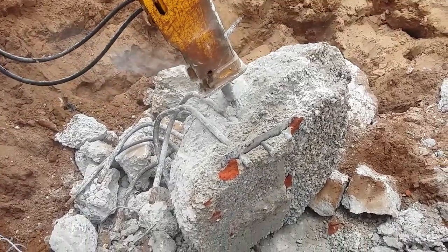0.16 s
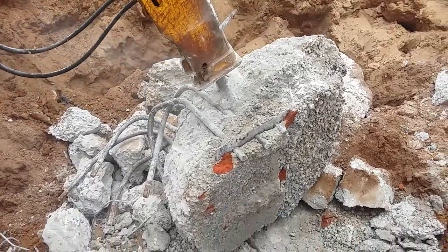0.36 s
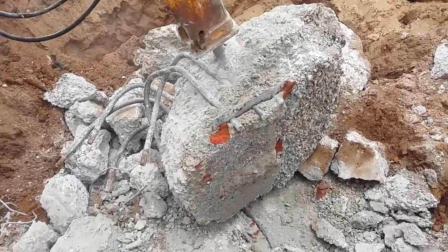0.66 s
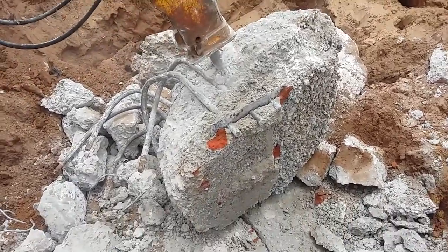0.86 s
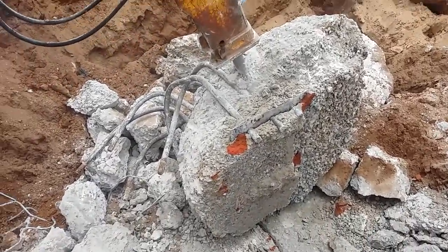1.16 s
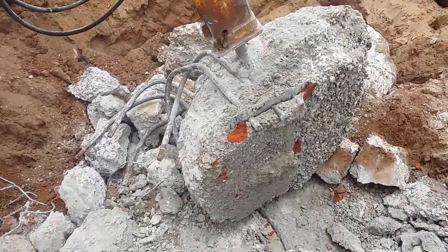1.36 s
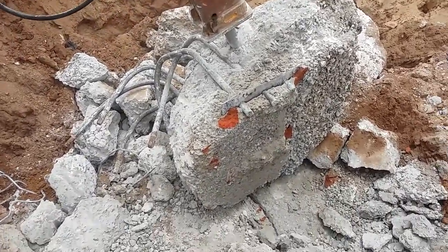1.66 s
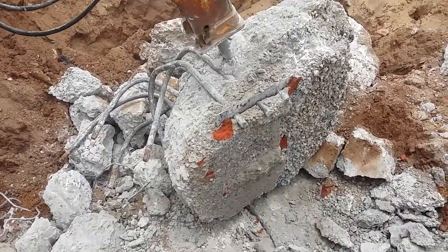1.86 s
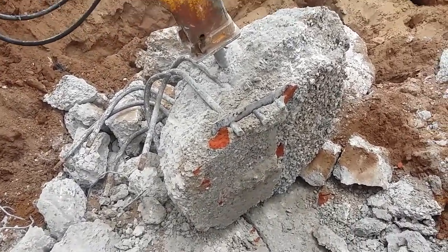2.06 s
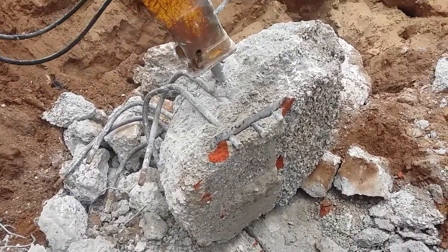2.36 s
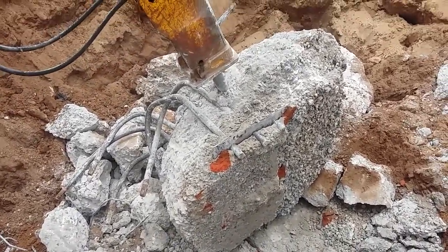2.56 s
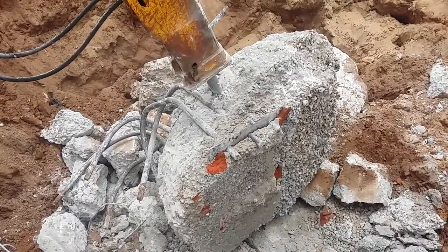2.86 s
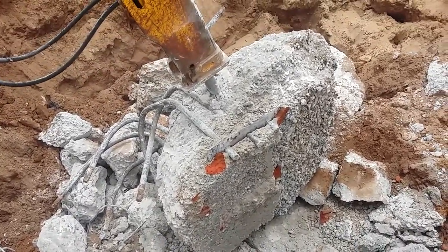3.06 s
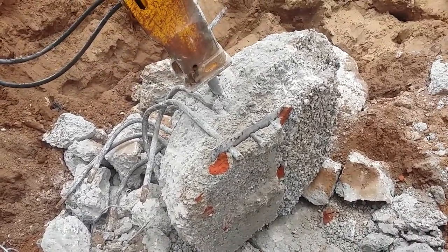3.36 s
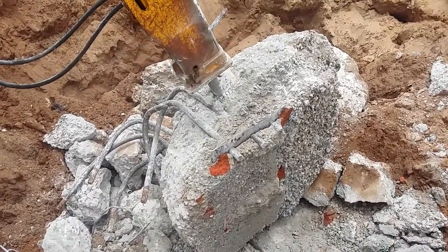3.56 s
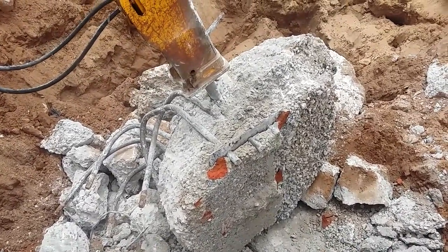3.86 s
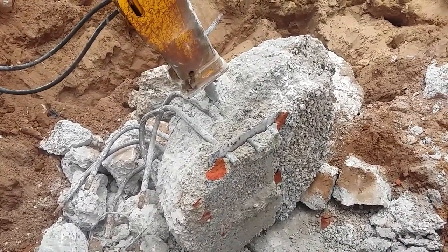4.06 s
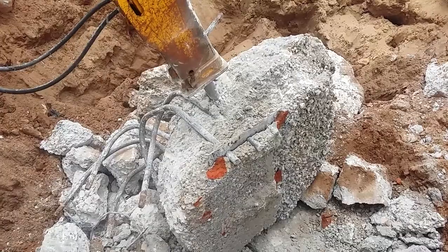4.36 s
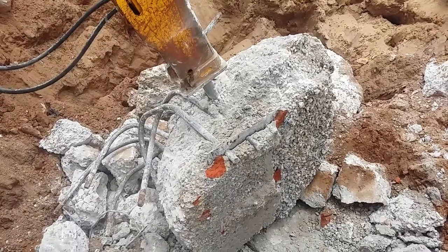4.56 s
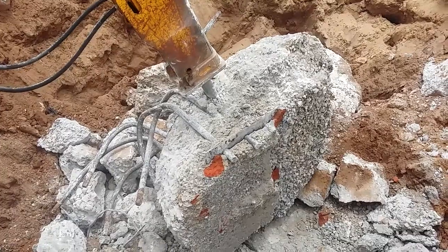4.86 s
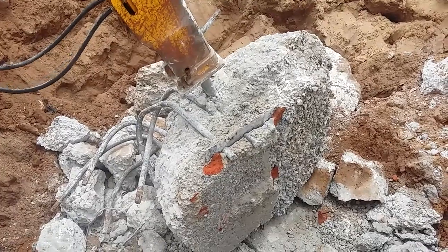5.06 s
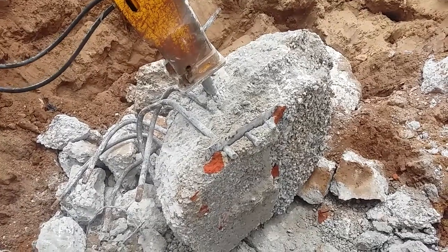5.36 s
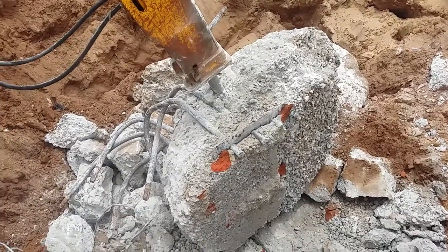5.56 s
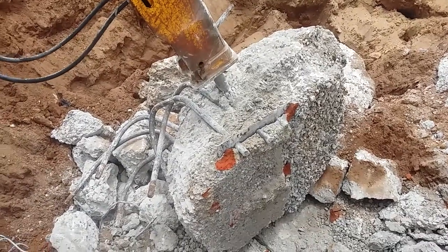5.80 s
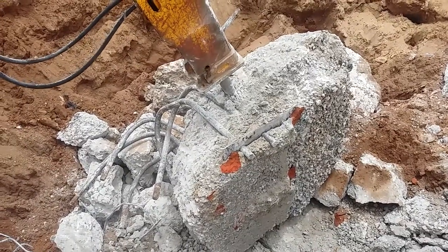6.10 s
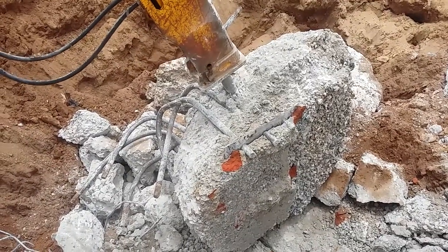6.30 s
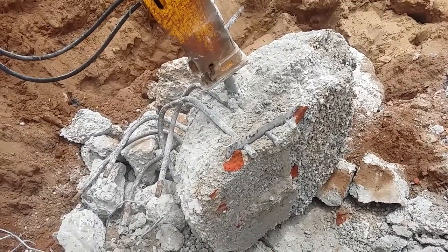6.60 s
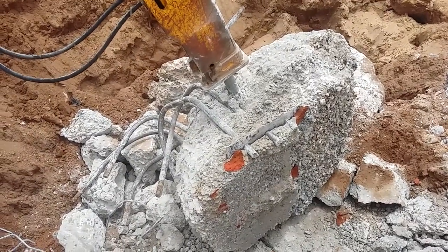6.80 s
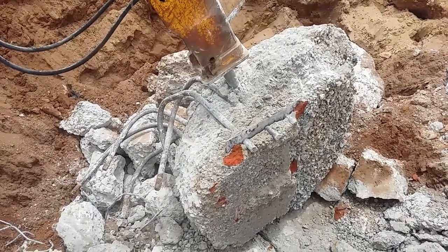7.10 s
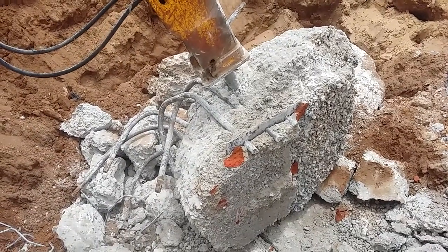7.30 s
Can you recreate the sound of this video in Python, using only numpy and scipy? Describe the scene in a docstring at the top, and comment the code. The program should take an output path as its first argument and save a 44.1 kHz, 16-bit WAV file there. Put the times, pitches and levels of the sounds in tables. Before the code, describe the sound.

A hydraulic breaker pounds concrete in rapid, even, ringing blows over a running diesel engine, hesitating briefly twice.

```python
"""Over a running diesel, an excavator's hydraulic breaker pounds concrete, nearly 11 blows a second.
Each blow: a valve clacks, the piston hits, the chisel cracks, concrete fizzes and sheds chips, machine
and pit clatter, the housing rings, the block thuds, the arm drones. The hammer stalls briefly at 1.2 s,
resumes and brightens as the chisel sinks, stumbles at 5 s, stalls again and pounds on from 5.2 s.
A phone listens from a few metres."""
import sys
import numpy as np
from scipy import signal
from scipy.fft import rfft, irfft
from scipy.io import wavfile
from scipy.ndimage import uniform_filter1d

SR = 44100
rng = np.random.default_rng(int(sys.argv[2]) if len(sys.argv) > 2 else 0)


def master(y):
    """Save y as 16-bit WAV."""
    cut = np.clip(np.atleast_2d(y).T, -1, 1)
    pcm = np.round(cut * 32767)  # scale
    wavfile.write(sys.argv[1], SR, pcm.astype(np.int16))


N = 328104
BLOW_SAMPLES = 8192
AGE_S = np.arange(BLOW_SAMPLES) / SR
BINS_HZ = np.arange(BLOW_SAMPLES // 2 + 1) * SR / BLOW_SAMPLES
PORT_LAG_S = .00011  # right microphone port behind left

# chisel sunk into the block: time_s, depth (0-1)
SINKING = [(0, 0.18), (1.15, 0.25), (1.35, 0.39), (2.3, 0.64), (3.3, 0.76), (4.3, 0.8), (5.0, 0.86),
           (5.3, 0.98), (7.4, 0.87)]


def undb(db):
    """Decibels to gain."""
    return np.exp(np.asarray(db) * (np.log(10) / 20))


def contour(points, size=BLOW_SAMPLES):
    """(freq_hz, value) points joined on a log axis, one value per bin."""
    hz, values = np.transpose(points)
    bins_hz = np.maximum(np.arange(size // 2 + 1) * SR / size, 1)
    return np.interp(np.log(bins_hz), np.log(hz), values)


def causal(gain_db):
    """Minimum-phase filter: rings only after it is struck."""
    cepstrum = irfft(gain_db * np.log(10) / 20)
    cepstrum[..., 1:BLOW_SAMPLES // 2] *= 2
    cepstrum[..., BLOW_SAMPLES // 2 + 1:] = 0
    return np.exp(rfft(cepstrum))


def burst(noise, rise_s, hold_s, t60_s):
    """Flattened spectrum of noise that swells, holds and decays."""
    decay = undb(-60 * np.maximum(AGE_S - hold_s, 0) / t60_s)
    spectrum = rfft(noise * (1 - np.exp(-AGE_S / rise_s)) * decay)
    return spectrum / np.sqrt(uniform_filter1d(np.abs(spectrum) ** 2, 81, axis=-1))


def play(times_s, sounds):
    """Mix one sound per time into stereo."""
    mix = np.zeros((2, N + 2 * BLOW_SAMPLES))
    for time_s, sound in zip(times_s, sounds):
        start = BLOW_SAMPLES + int(time_s * SR)
        mix[:, start:start + BLOW_SAMPLES] += sound
    return mix[:, BLOW_SAMPLES:BLOW_SAMPLES + N]


def wander(rate_hz):
    """Slow random curve, spread near 1."""
    count = int(N / SR * rate_hz) + 2
    return np.interp(np.linspace(0, count - 1, N), np.arange(count), rng.standard_normal(count))


def diesel(shaft_hz=26.95):
    """Engine orders waver under load, over the rush of fan and oil."""
    # engine orders: shaft_multiple, level_db
    orders = [(2, -53), (3, -57.5), (4, -53), (5, -55), (6, -53), (7, -48), (10, -49.5)]
    # fan and oil flow: freq_hz, gain_db
    rush_spectrum = [(25, -45), (42, -29), (60, -16), (100, -17), (170, -18), (350, -0.5), (550, -3.5),
                     (1000, -10), (1450, -16.5), (2600, -7), (3500, -18.5), (4900, -20), (8000, -42),
                     (15000, -65)]
    turns = np.cumsum(shaft_hz * (1 + 0.0126 * wander(6))) / SR
    hum = 0
    for multiple, level_db in orders:
        amplitude = np.sqrt(2) * undb(level_db + 0.58 * wander(11))
        hum += amplitude * np.sin(2 * np.pi * (multiple * turns + rng.random()))
    mid, side = rfft(rng.standard_normal((2, N))) * undb(contour(rush_spectrum, size=N))
    side *= undb(contour([(100, -6), (600, -6), (2000, 1)], size=N))
    rush = irfft(np.array([mid + side, mid - side]), N)
    rush /= np.sqrt(np.mean(rush ** 2))
    return hum + rush * undb(-34 + wander(15))


def stroke_times(start_s, count, first_period_s, last_period_s, run_up_loss_s):
    """The piston reaches speed in a few strokes; its period drifts with the oil flow."""
    stroke = np.arange(count)
    mean_period_s = first_period_s + (last_period_s - first_period_s) * stroke / (2 * (count - 1))
    return start_s + stroke * mean_period_s + run_up_loss_s * (1 - np.exp(-stroke))


def blows(stumble_ring=-9, unseat_s=.03, unseated_bright=-10):
    """Blow times and four controls (strength, ring, bright, drone) that each source scales to dB."""
    # runs of hammering: start_s, count, first_period_s, last_period_s, run_up_loss_s
    runs = [(-.0078, 13, .09497, .09438, 0), (1.3445, 39, .09402, .09309, .012),
            (5.2268, 24, .093, .093, 0)]
    # late blow and rebound before the second stall: time_s, strength
    stumble = [(5.021, -0.5), (5.041, -7.5)]
    # housing ring and chisel brightness: time_s, ring, bright
    tone = [(0, 3.5, -6), (.6, 3, -5.5), (1.1, 3, -2), (1.6, 4, -10), (2.2, 5, -3.5), (3.1, 4, 4),
            (4.2, 2, 11.5), (4.9, 1, 9), (5.4, 0, 9.5), (6.1, -2, 5.5), (7.4, -2.5, 5)]
    # arm vibration: time_s, drone
    arm_drone = [(0, 15), (1.1, 12.5), (1.9, 0.5), (2.7, -7), (3.3, 2), (4.3, -1), (4.8, 7), (5.3, -2),
                 (5.8, 6), (6.4, 1), (6.8, -8), (7.4, 2.5)]
    hits = [(time_s, 0, 0) for run in runs for time_s in stroke_times(*run)]
    hits += [(time_s, strength, stumble_ring) for time_s, strength in stumble]
    times_s, strength, ring = np.transpose(sorted(hits))
    gaps_s = np.diff(times_s, prepend=times_s[0])
    unseated = np.clip((gaps_s - np.median(gaps_s)) / unseat_s, 0, 1)  # a long wait dulls the next blow
    depth = np.interp(times_s, *np.transpose(SINKING))
    tone_s, tone_ring, tone_bright = np.transpose(tone)
    bright = np.interp(times_s, tone_s, tone_bright) + unseated_bright * unseated * depth
    strength -= 0.13 * bright
    ring += np.interp(times_s, tone_s, tone_ring)
    drone = np.interp(times_s, *np.transpose(arm_drone))
    scatter = rng.standard_normal((len(times_s), 4)) * (.6, 1.1, 1.6, 2.5)
    return times_s, np.array([strength, ring, bright, drone]) + scatter.T


def valve(times_s, depth, lead_s=.0215, jitter_s=.0011):
    """The control valve clacks over just before the piston lands."""
    colour = causal(contour([(100, -62), (400, -24), (1500, -1), (3000, -2.5), (4200, 9), (5800, -3),
                             (7500, -14.5), (15000, -27)]))
    noise = rng.standard_normal((2, BLOW_SAMPLES))
    clack = irfft(burst(noise, rise_s=0.0008, hold_s=0.005, t60_s=0.053) * colour)
    timing, force = rng.standard_normal((2, len(times_s)))
    level_db = 1 - 0.83 * depth + 2 * force[:, None, None]
    return play(times_s - lead_s + jitter_s * timing, clack * undb(level_db))


def vibration(times_s, memory, fresh):
    """Dense stereo noise per blow, much like the last until a broken rhythm reseats the chisel."""
    gaps_s = np.diff(times_s, prepend=times_s[0] - 1)
    steady = np.abs(gaps_s / np.median(gaps_s) - 1) < .06
    seat = rng.standard_normal((2, BLOW_SAMPLES))
    patterns = []
    for carry in np.where(steady, memory, .5):
        seat = carry * seat + np.sqrt(1 - carry ** 2) * rng.standard_normal(seat.shape)
        patterns.append(seat + fresh * rng.standard_normal(seat.shape))
    mid, side = np.swapaxes(rfft(np.array(patterns)), 0, 1)
    # long waves reach both ports alike
    side *= undb(contour([(100, -17), (300, -13), (700, -11), (1300, -4), (2500, -2)]))
    port_delay = np.exp(-2j * np.pi * BINS_HZ * PORT_LAG_S)
    return irfft(np.stack([mid + side, (mid - side) * port_delay], axis=1))


def chisel_resonance_db(depth, reach=0.43, scatter=0.14):
    """Spectral lift per blow and port; each resonance peaks at its own depth."""
    # chisel resonances: freq_hz, width_hz, lift_db, best_depth, left_minus_right_db
    modes = [(1043, 176, 6, 1.05, 10), (2160, 300, 16, 0.07, -8), (2198, 86, 10, 0.99, -2.5),
             (2873, 287, 8, 0.89, -4.5), (3165, 192, 21, 0, -7.5), (3063, 210, 13, 1.1, -6.5),
             (3711, 55, 7, .85, -16), (3870, 113, 10.5, .9, 0), (4294, 100, 12, .42, -4.5),
             (4752, 80, 9, 0.78, 2), (4938, 146, 10, 0.73, 2), (6090, 280, 9, 0.6, -4)]
    freq_hz, width_hz, lift_db, best_depth, pan_db = np.transpose(modes)[:, :, None]
    peaks = 1 / (1 + (2 * (BINS_HZ - freq_hz) / width_hz) ** 2)
    grip = np.exp(-((depth[:, 0] - best_depth.T) / reach) ** 2)
    grip *= 1 + scatter * rng.standard_normal(grip.shape)
    return np.stack([grip @ (peaks * (lift_db + port * pan_db)) for port in (.5, -.5)], axis=1)


def dispersion(depth):
    """Low bending waves run slower: the crack sweeps down, more so with depth."""
    delay_s = depth * contour([(500, .004), (1000, .002), (2000, .001), (3000, .002),
                               (4000, .0008), (5000, 0)])
    return np.exp(-2j * np.pi * np.cumsum(delay_s, axis=-1) * SR / BLOW_SAMPLES)


def chisel(times_s, depth, strength, ring, bright, chatter_s=0.01238):
    """Steel on concrete: a hard crack, tighter with depth, then clatter from machine and pit."""
    # first crack: freq_hz, gain_db
    crack_spectrum = [(50, -54), (130, -30.5), (350, -19), (700, -2), (1100, 2), (1550, -0.5), (2500, 0.5),
                      (3500, -1.5), (4600, 1), (5700, -6), (7200, -16), (10000, -27.5), (15500, -31)]
    # clatter after it: freq_hz, gain_db
    clatter_spectrum = [(40, -41), (95, -28), (140, -5.5), (230, -11), (350, -9.5), (550, 1.5), (800, 2.5),
                        (1200, 4.5), (1550, 1), (2600, 2.5), (3500, -2.5), (4800, -4), (6000, -12.5),
                        (7500, -26.5), (15500, -45.5)]
    # microphone ports: freq_hz, left_minus_right_db
    port_balance = [(200, -9), (440, -2), (620, 8), (900, -6), (1300, -2.5), (2000, 0), (2500, -5.5),
                    (3400, -6.5), (4200, 6.5), (5200, 9), (6200, 7), (7500, 3), (15000, 7.5)]
    per_blow = (len(times_s), 1, 1)
    contact = vibration(times_s, memory=0.96, fresh=0.37)
    lift_db = chisel_resonance_db(depth)
    tone_db = 0.7 * strength + ring * contour([(350, 0.19), (750, 0.22), (1200, 0.13), (2000, 0.014)])
    tone_db += bright * contour([(3000, 0), (5000, 0.29), (9000, 0.13)])
    hardness = rng.standard_normal(per_blow)
    tone_db += hardness * contour([(5000, 0.33), (12000, 1.9)])
    stereo_db = tone_db + np.array([[.5], [-.5]]) * contour(port_balance)

    crush_s = 0.0059 + 0.0015 * np.exp(-depth / 0.12)  # a crumbling surface prolongs contact
    bite = 1 + undb(-2.5 - 6.2 * depth) * np.exp(-AGE_S / 0.0035)  # first touch of steel
    crack = burst(contact * bite, rise_s=0.00009, hold_s=crush_s, t60_s=0.1 * undb(-9 * depth))
    crack *= causal(stereo_db + contour(crack_spectrum) + lift_db) * dispersion(depth)

    chatter_phase = 2 * np.pi * AGE_S / chatter_s + rng.standard_normal(per_blow)  # chisel in its bushing
    rattle = vibration(times_s, memory=0.951, fresh=0.88) * undb(1.14 * np.sin(chatter_phase))
    clatter = burst(rattle, rise_s=0.0084, hold_s=0.014, t60_s=0.24)
    clatter *= causal(stereo_db + contour(clatter_spectrum) + 0.47 * lift_db)
    return play(times_s, irfft(crack * undb(19.5) + clatter * undb(20.5 - 2.25 * depth)))


def crumble(times_s, bright):
    """Concrete crushed under the tip fizzes briefly."""
    colour = causal(contour([(300, -28), (2000, -9), (4500, 4), (6000, 0), (7500, 0), (10000, -12),
                             (15500, -18)]))
    noise = rng.standard_normal((len(times_s), 2, BLOW_SAMPLES))
    fizz = burst(noise, rise_s=0.0013, hold_s=0.005, t60_s=.13)
    return play(times_s, irfft(fizz * colour) * undb(-3 + 0.13 * bright))


def grit(times_s, depth, chips_per_s=900, t60_s=0.12):
    """Chips burst from the tip and patter down, most while the surface is still breaking."""
    shape = (len(times_s), 2, BLOW_SAMPLES)
    chips = (rng.random(shape) < chips_per_s / SR) * rng.standard_normal(shape) ** 3
    colour = causal(contour([(100, -57), (400, -26), (1200, 4), (2800, 12.5), (5000, -8.5),
                             (7500, -15), (15000, -55)]))
    patter = irfft(rfft(chips * undb(-60 * AGE_S / t60_s)) * colour)
    return play(times_s, patter * undb(-16 - 3 * depth))


def housing(times_s, depth, ring, rise_s=0.0045, scatter_db=1.5):
    """The steel casing rings on from blow to blow, each mode's level varying."""
    # casing modes: pitch_hz, t60_s, relative_db, full_depth_change_db
    modes = [(608.7, 0.4, -12, -8.5), (702.4, 0.29, -7.5, -1.5), (801.3, 0.41, -7.5, 4.5),
             (847, 0.27, -29, -21), (970.7, 0.27, 1.5, -4.5), (1139.6, 0.16, -1, -5),
             (1242.7, 0.09, 2.5, -1), (1848, 0.61, -18.5, 3.5), (2150, 0.11, -1.5, 1.5)]
    pitch_hz, t60_s, relative_db, sunk_db = np.transpose(modes)[:, :, None]
    phase = rng.uniform(0, 2 * np.pi, (len(modes), 1))
    random_db = scatter_db * rng.standard_normal((len(times_s), len(modes)))
    gains = undb(relative_db.T + depth[:, 0] * sunk_db.T + random_db)
    end_taper = 1 - (AGE_S / AGE_S[-1]) ** 10
    envelope = (1 - np.exp(-AGE_S / rise_s)) * undb(-60 * AGE_S / t60_s) * end_taper
    ports = [gains @ (envelope * np.sin(2 * np.pi * pitch_hz * (AGE_S - lag_s) + phase))
             for lag_s in (0, PORT_LAG_S)]
    return play(times_s, np.stack(ports, axis=1) * undb(1.47 * ring - 21))


def swell(pitch_hz, delay_s, rise_s):
    """A heavy part builds up over a few cycles, then settles."""
    age_s = np.maximum(AGE_S - delay_s, 0)
    envelope = (age_s / rise_s * np.exp(1 - age_s / rise_s)) ** 2
    return envelope * np.sin(2 * np.pi * pitch_hz * age_s)


def block(times_s, depth, strength, firmest_depth=0.84, scatter_db=0.85):
    """The block thuds and rocks back, most where the chisel grips firmest."""
    # block and ground modes: pitch_hz, delay_s, rise_s, level_db
    modes = [(59.6, .015, 0.043, -49), (175, 0.0011, 0.0076, -31.5), (157.2, 0.01923, 0.017, -30),
             (277.3, 0.001, .012, -29), (361, 0.0029, 0.012, -36), (452, 0.00986, 0.0089, -33.5)]
    shapes = np.array([undb(level_db) * swell(*mode) for *mode, level_db in modes])
    thuds = undb(scatter_db * rng.standard_normal((len(times_s), len(modes)))) @ shapes
    grip_db = -14 * (depth - firmest_depth) ** 2
    return play(times_s, thuds[:, None] * undb(strength + grip_db))


def arm(times_s, drone):
    """Recoil sets the excavator arm droning."""
    return play(times_s, swell(pitch_hz=236.3, delay_s=0.00058, rise_s=0.037) * undb(0.64 * drone - 34))


def scene():
    """Over the engine, each blow drives chisel, concrete, casing and arm together."""
    times_s, controls = blows()
    depth = np.interp(times_s, *np.transpose(SINKING))[:, None, None]
    strength, ring, bright, drone = controls[:, :, None, None]
    steel = chisel(times_s, depth, strength, ring, bright) + housing(times_s, depth, ring)
    clacks = valve(times_s, depth)
    concrete = crumble(times_s, bright) + grit(times_s, depth) + block(times_s, depth, strength)
    return diesel() + clacks + steel + concrete + arm(times_s, drone)


def record(dry):
    """The phone rounds the highest peaks and cuts the top."""
    ceiling, cutoff_hz = .98, 15900
    rounded = dry / (1 + (dry / ceiling) ** 4) ** (1 / 4)
    return signal.sosfilt(signal.ellip(8, .2, 70, cutoff_hz, fs=SR, output="sos"), rounded)


dry = scene()
out = record(dry)
master(out)
```